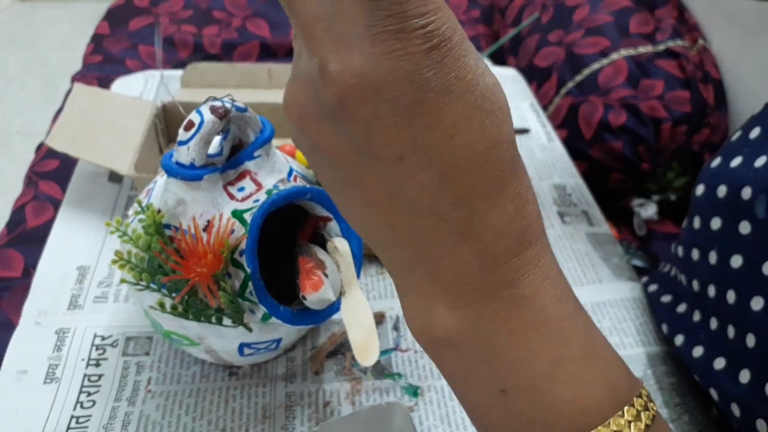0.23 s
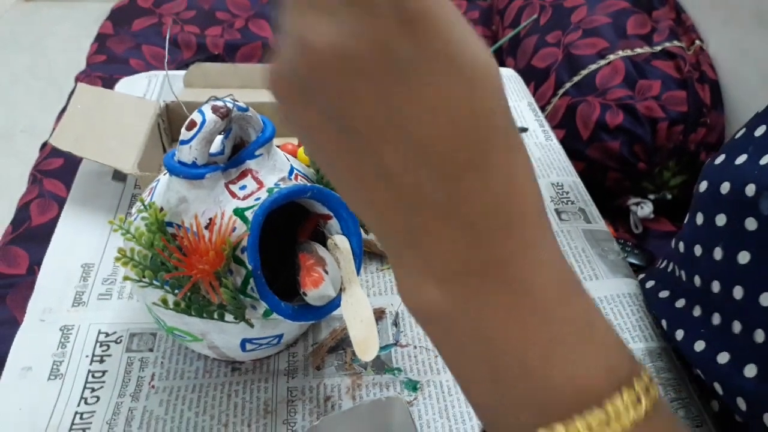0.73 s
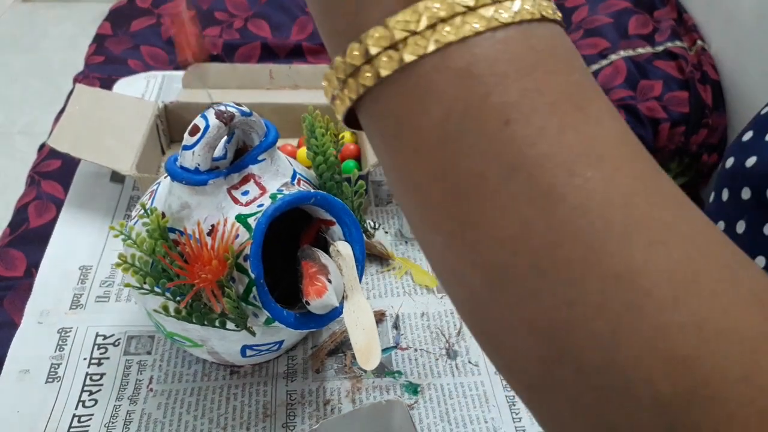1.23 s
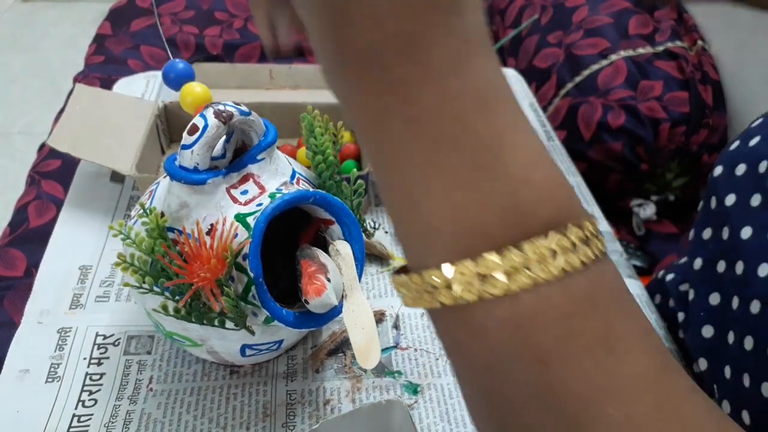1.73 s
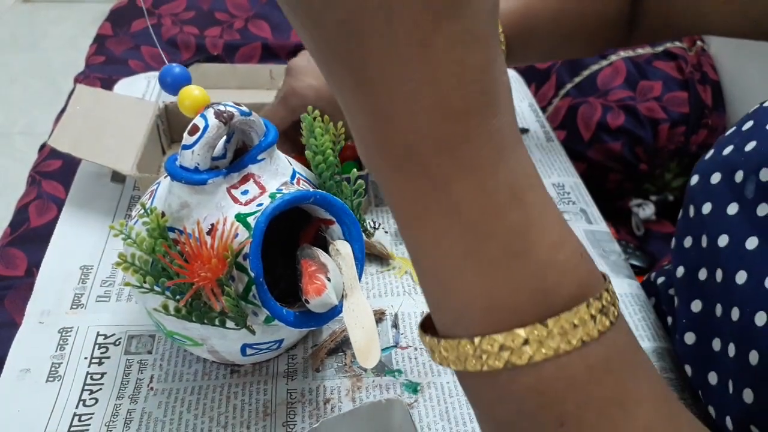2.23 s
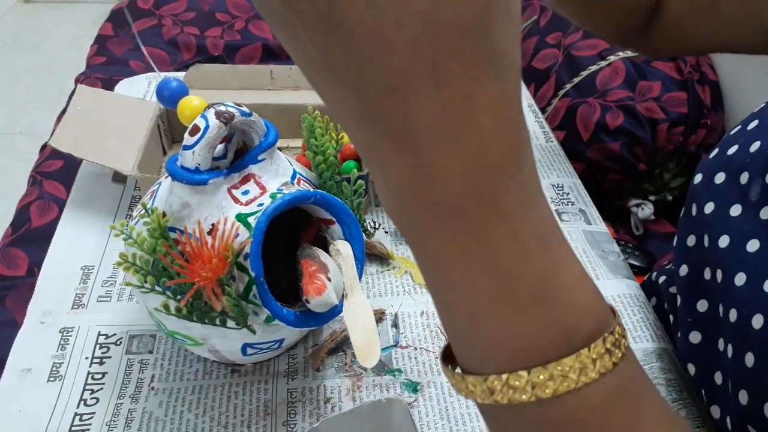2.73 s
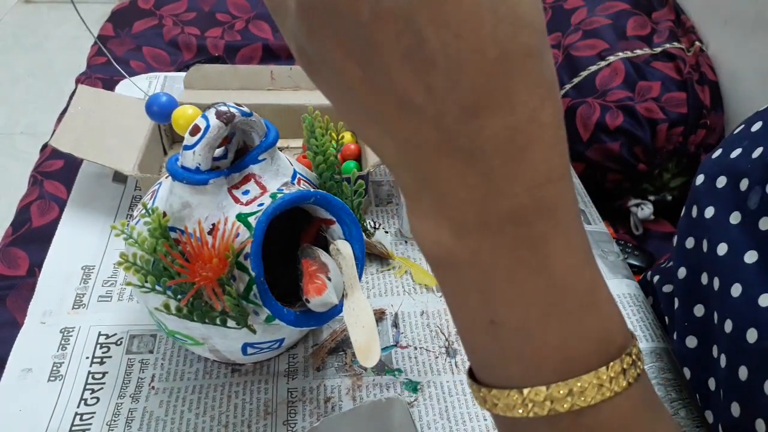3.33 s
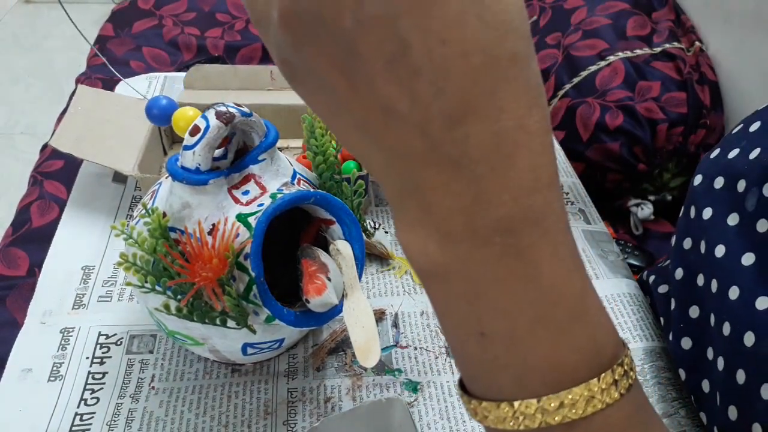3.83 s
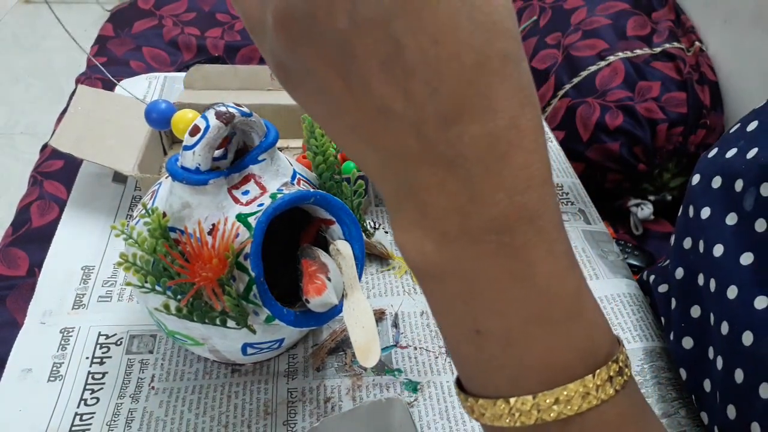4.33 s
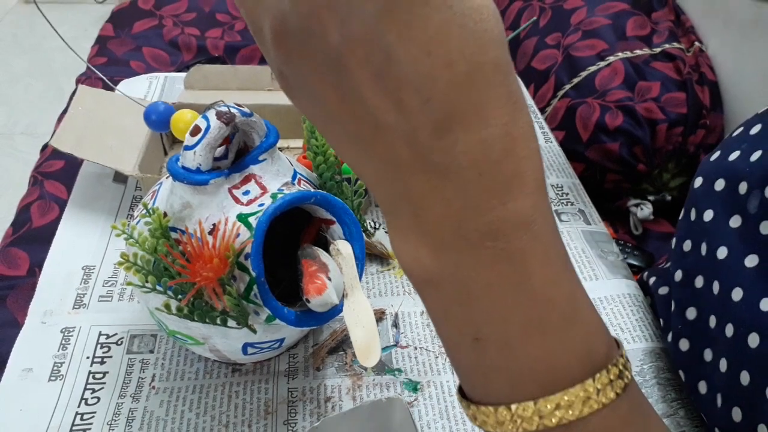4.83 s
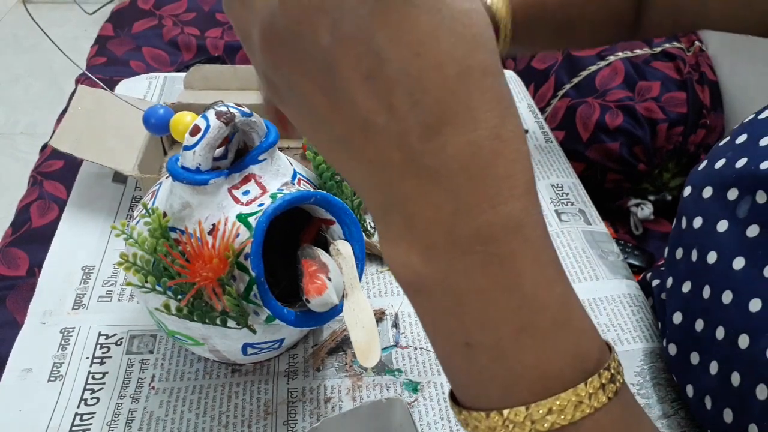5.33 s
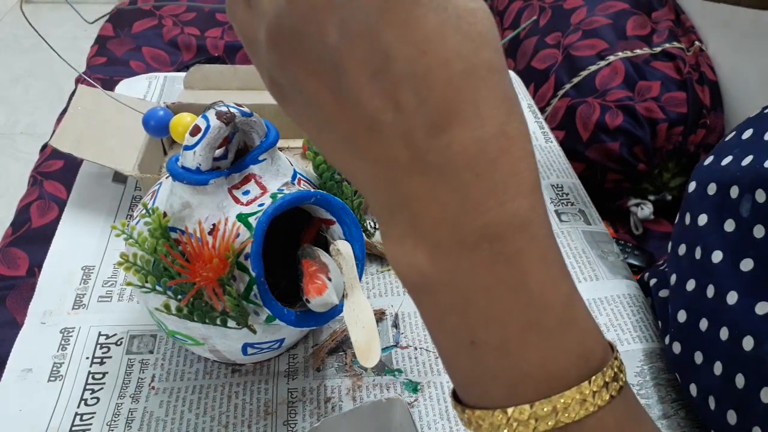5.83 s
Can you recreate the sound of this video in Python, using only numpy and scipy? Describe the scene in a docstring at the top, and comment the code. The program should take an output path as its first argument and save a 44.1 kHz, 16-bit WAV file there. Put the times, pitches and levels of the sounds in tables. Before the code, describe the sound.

Bangles on a beadworker's arm give soft clinks, a cloth brush, and a bright burst of ringing taps. Next come woody knocks and short scrapes of beads pushed in a box. The wire barely scratches and squeaks. A motor dies away behind, leaving faint hiss, low rumble and a clock tick each second. Late on, one double clink and one knock. Close microphone, small room, almost identical channels.

```python
"""Two metal bangles slide along a forearm and clink, as someone threads beads onto a wire in a small room. Each
clink is a noise crack plus two sets of damped modes; grazes are streams of small taps. Nearer the box, knocks,
rubs and rolling beads are shaped noise; the wire scratches and squeaks faintly. Behind them a motor's hum and
hiss fade, a far clock ticks once a second, and a low rumble drifts. Both channels hear almost the same, but for
a faint blurred copy of the sound and faint steady noise, opposite in the two."""
import sys
import numpy as np
from scipy import signal
from scipy.fft import rfft, irfft, next_fast_len
from scipy.io import wavfile
from scipy.ndimage import uniform_filter1d

SR = 44100
rng = np.random.default_rng(int(sys.argv[2]) if len(sys.argv) > 2 else 0)


def materialize(psi):
    """Save the field psi as 16-bit PCM at rate SR to the path in sys.argv[1].

    A 1-D psi becomes a single channel; in a 2-D psi each row is a channel.
    """
    bounded = np.clip(np.atleast_2d(psi).T, -1, 1)
    quanta = np.round(bounded * 32767).astype(np.int16)
    wavfile.write(sys.argv[1], SR, quanta)


N = 268216  # samples
TIME = np.arange(N) / SR  # s

# Room tone's hiss. Each row: frequency in Hz, relative level in dB per Hz.
HISS_COLOUR = [(88, -31), (150, -2), (332, -8), (462, -9.5), (500, -6), (656, -13.5), (1060, -17),
               (1450, -20.5), (1630, -19), (2230, -21.5), (4930, -22.5), (6600, -24), (7270, -24.5),
               (8010, -25), (15500, -24)]
HISS_DB = -74.5  # rms
# The room's low rumble. Each row: frequency in Hz, relative level in dB per Hz.
RUMBLE_COLOUR = [(15, -61), (25, -27.5), (36, -17), (54, 2.5), (102, -1.5), (129, -7), (173, -19),
                 (200, -20.5), (260, -47), (440, -120)]
RUMBLE_DB = -70  # rms between swells
# The rumble swells now and then. Each row: start in seconds, length in seconds, level in dB.
RUMBLE_SWELLS = [(0, 0.89, -65.5), (2.6, 0.63, -67)]
RUMBLE_RISE_DB_PER_S, RUMBLE_FALL_DB_PER_S = 120, 71
# A far fan's faint tones. Each row: frequency in Hz, level in dB rms.
FAN_TONES = [(496, -82.5), (402, -87.5)]
# Faint steady noise, opposite in the two channels. Each row: frequency in Hz, relative level in dB per Hz.
SIDE_NOISE_COLOUR = [(18, -32), (30, -5), (117, -2), (307, -7), (389, -3), (467, -9), (2990, -9),
                     (15500, -13)]
# How long the room rings. Each row: frequency in Hz, time to fall 60 dB in seconds.
ROOM_DECAY = [(150, 0.75), (500, 0.16), (1500, 0.39), (3500, 0.45), (7000, 0.3), (14000, 0.33)]
EDGE_HZ = 15900  # upper band limit

# Ticks of the far clock. Each row: start in seconds, level in dB.
CLOCK_TICKS = [(0.63, -63.5), (1.63, -68.5), (2.62, -68), (3.618, -70), (4.619, -66.5), (5.62, -68.5)]
# Colour of a tick. Each row: frequency in Hz, relative level in dB per Hz.
TICK_COLOUR = [(600, -13.5), (1300, -5), (2000, -3), (2700, -9), (3700, -6.5), (4500, -9), (5500, -10),
               (7500, -19), (9500, -10), (12000, -31)]

# The motor's hum. Each row: multiple of the shaft speed, level in dB rms before the surges act on it.
HUM_ORDERS = [(4, -62.5), (5, -53.5), (6, -61.5), (9, -69)]
SHAFT_HZ = 24.63  # mean turns per second
# The hum comes in surges. Each row: start in seconds, length in seconds, gain in dB.
HUM_SURGES = [(0, 0.31, 1.5), (0.67, 0.023, 0), (1.02, 0.031, -4)]
SURGE_RISE_DB_PER_S, SURGE_FALL_DB_PER_S = 100, 60
HUM_REST_DB, HUM_FADE_DB_PER_S = -12.5, 4  # gain of the fading hum that lingers under the surges
# The air that the motor moves. Each row: frequency in Hz, relative level in dB per Hz.
AIR_COLOUR = [(60, -8), (200, -1.5), (500, -6), (780, -13.5), (1000, -10.5), (1250, -20.5), (1900, -14.5),
              (2330, -7.5), (2700, -20.5), (3550, -14.5), (4500, -27.5), (4980, -10.5), (5700, -19.5),
              (8000, -30), (9200, -29.5), (11000, -46.5)]
# the rush sags slowly from AIR_DB, then fades faster after AIR_BEND_S
AIR_DB, AIR_SAG_DB_PER_S, AIR_BEND_S, AIR_FALL_DB_PER_S = -54.5, 7.5, 1.63, 30

# The arm brushes over cloth. Each row: start in seconds, length in seconds, level in dB.
BRUSHES = [(0.716, 0.0036, -53), (0.8, 0.18, -55.5), (1.05, 0.47, -68)]
BRUSH_RISE_DB_PER_S, BRUSH_FALL_DB_PER_S = 918, 143
# Colour of the cloth. Each row: frequency in Hz, relative level in dB per Hz.
CLOTH_COLOUR = [(60, -16), (220, 0), (450, -9), (700, -12), (1300, -1), (3000, 5.5), (6000, 5.5),
                (10000, 3.5), (13000, 0), (16000, -9.5)]

# The wire slides through a bead. Each row: start in seconds, length in seconds, level in dB.
THREADINGS = [(2.87, 0.23, -80.5), (3.125, .025, -75.5), (3.915, 0.013, -79)]
THREAD_RISE_DB_PER_S, THREAD_FALL_DB_PER_S = 253, 219
# Colour of the wire's scratch. Each row: frequency in Hz, relative level in dB per Hz.
WIRE_COLOUR = [(1500, -6.5), (4000, -4.5), (6000, -3), (7400, -5), (8300, -2), (9500, -2.5), (11500, -10.5),
               (16000, -10)]
# The wire squeaks in the hole of a bead. Each row: start in seconds, length in seconds,
# mean pitch at the start in Hz, mean pitch at the end in Hz, level in dB rms.
SQUEAKS = [(2.822, 0.19, 7300, 7390, -84.5), (2.951, 0.054, 15400, 14530, -79),
           (5.018, 0.072, 7440, 7480, -90), (5.058, 0.11, 11560, 11070, -79),
           (5.276, 0.11, 7450, 7370, -84)]

# Fingers rub the wall of the box. Each row: start in seconds, length in seconds, level in dB.
RUBS = [(1.78, .14, -81.5), (1.932, 0.071, -60.5), (2.14, 0.054, -65.5), (2.385, .06, -79),
        (5.168, 0.077, -67.5)]
RUB_RISE_DB_PER_S, RUB_FALL_DB_PER_S = 492, 264
# Colour of the rubbing. Each row: frequency in Hz, relative level in dB per Hz.
RUB_COLOUR = [(800, -6), (2000, -1), (3800, 12.5), (6000, 2), (8000, 1.5), (9500, 7), (12000, -2.5),
              (16000, -10)]
# A push sends beads rolling over the bottom of the box until they settle.
# Each row: start in seconds, level in dB, pitch of the box there in Hz.
PUSHES = [(1.927, -57, 900), (1.996, -56.5, 845), (2.15, -58, 1040), (2.272, -60, 907), (5.164, -62, 1270),
          (5.279, -97, 1078)]
PUSH_RISE_DB_PER_S, PUSH_HOLD_S, PUSH_FALL_DB_PER_S = 898, 0.029, 151
# Colour of the rolling where the box has the pitch SCRAPE_HZ.
# Each row: frequency in Hz, relative level in dB per Hz.
SCRAPE_COLOUR = [(30, -46), (100, 5), (300, -7.5), (600, 5.5), (1200, 1), (1800, -1), (2600, -27),
                 (4000, -34), (7000, -28)]
SCRAPE_HZ = 1000

# Dull knocks of beads in the box and of the hand and bangles on the work.
# Each row: start in seconds, level in dB, pitch of the knock in Hz.
KNOCKS = [(0.677, -50.5, 356), (0.7163, -55, 1000), (1.338, -54.5, 299), (1.458, -57.5, 1100),
          (1.462, -56, 472), (1.935, -55, 1900), (1.994, -43.5, 920), (2.0268, -45, 1020),
          (2.133, -56, 1490), (2.150, -45.5, 1270), (2.269, -57.5, 1000), (2.39, -55, 700),
          (2.422, -53, 588), (2.441, -58.5, 410), (3.421, -61, 460), (4.47, -55.5, 445),
          (4.501, -58.5, 557), (5.148, -59, 1520), (5.152, -51, 1380), (5.165, -56.5, 1820),
          (5.17, -41.5, 1230), (5.277, -54.5, 1266)]
# Colour of a knock. Each row: multiple of its pitch, relative level in dB per Hz.
KNOCK_COLOUR = [(.03, -41.5), (.1, -23), (.3, -10), (.6, 1), (1, 6), (1.3, -3), (1.9, -16), (3, -15),
                (5, -29.5), (12, -44.5)]
# a knock's 60 dB decay: a fixed part, plus a part given at the reference pitch
# that shortens by the power KNOCK_DAMPING of the pitch
KNOCK_DEAD_T60_S, KNOCK_T60_S, KNOCK_REFERENCE_HZ, KNOCK_DAMPING = 0.019, 0.13, 400, 2.9

# Modes of the two bangles, before tilt and detuning. Each row: frequency in Hz, relative level in dB.
FIRST_BANGLE_MODES = [(1954, -19.0), (2707, -12.5), (2534, -3), (2631, -1.0), (3440, -7.5), (3557, -18.0),
                      (3727, -3.5), (4307, -19), (4443, -13.0), (4735, -3.5), (4919, -8.5), (5329, -11.0),
                      (5857, -14.0), (6068, -17), (6358, -16.5), (6621, -16), (6763, -17.5), (6989, -16.0),
                      (7164, -20.0), (7269, -11.0), (7640, -8.5), (7843, -20.5), (8094, -21.5),
                      (8703, -18.0), (8973, -14.5), (9332, -20.0), (10749, -26), (11402, -25.5)]
SECOND_BANGLE_MODES = [(2634, 0.5), (3741, -2), (4525, -12), (4709, -2.5), (4932, -3), (5058, -1.5),
                       (5251, -7.5), (5324, -7), (5743, -8.5), (6063, -5.5), (6617, -2.5), (6988, -5),
                       (7079, -1), (7670, -9), (8086, -11.5), (8597, -2.5), (9363, -8.5), (9516, -10),
                       (9644, -6.5), (9728, -6), (9847, -11.5), (11095, -13.5), (11282, -7), (11776, -13),
                       (12010, -12), (12858, -10.5)]
# Short crack of metal on metal, before tilt. Each row: frequency in Hz, relative level in dB per Hz.
CRACK_COLOUR = [(120, -23), (400, -16.5), (900, -25), (1500, -11), (2300, -6), (4800, 10), (7000, -2.5),
                (9500, 1), (13000, -8.5), (16000, -15.5)]
# The bangles graze as the arm moves. Each row: start in seconds, length in seconds, level in dB.
GRAZES = [(0.8, 0.043, -54), (0.868, .08, -47.5), (1.08, .065, -44.5), (1.2, .025, -50), (1.272, .1, -46),
          (1.47, 0.013, -61)]
GRAZE_RISE_DB_PER_S, GRAZE_FALL_DB_PER_S = 450, 230.5
# Colouring of a light graze. Each row: frequency in Hz, relative gain in dB.
GRAZE_COLOUR = [(1500, -16.5), (2600, -5), (3700, -0.5), (4600, -5), (5300, 3.5), (7300, -4.5), (9300, -1),
                (10500, -6), (16000, -7)]
# Bangle clinks. Each row: start in seconds, level in dB, glance from 0 square-on to 1 skimming,
# share of the second bangle's power from 0 to 1.
CLINKS = [(0.130, -53.5, 1, .4), (0.148, -51.5, 0.24, 0.9), (0.162, -45.5, 0.59, 0.5),
          (0.805, -55, 0.5, 0.4), (0.885, -44.5, 0.81, 0.3), (0.928, -46, 1, 0.15), (1.067, -45, 0.48, 0.5),
          (1.078, -44.5, 0.14, 0), (1.106, -41, 0.43, 0.34), (1.121, -38, 0.7, 0.3),
          (1.205, -42, 0.54, 0.13), (1.296, -32.5, 0, .03), (1.301, -30.5, 0, 0), (1.336, -24.5, 0.0044, 0),
          (1.342, -29, 0.045, .05), (1.399, -42, 0.54, .2), (1.457, -36.5, 0.2, 0.17),
          (4.466, -35.5, .44, .99), (4.469, -33, 0.73, 0.7)]
# what the glance does to a clink: (square-on, skimming)
CLINK_TILT_DB = (-5.5, 10.5)  # per octave
CLINK_CRACK_DB = (-5.5, -1)  # relative to the ringing
CLINK_RISE_S = (0.00036, 0.0019)  # time constant
CLINK_ROOM_DB = (-6.5, -1)  # feed to the room


def gain_of(db):
    """Decibels to amplitude."""
    return 10 ** (np.asarray(db) / 20)


def evened(x):
    """Scales to rms 1."""
    return x / np.sqrt(np.mean(x ** 2) + 1e-20)


def struck(x):
    """Scales a blow so that its first 10 ms have rms 1."""
    return x / np.sqrt(np.mean(x[:SR // 100] ** 2) + 1e-20)


def read(points, hz):
    """A table joined by straight lines on a log-frequency axis."""
    f, value = np.transpose(points)
    return np.interp(np.log(hz + 1e-3), np.log(f), value)


def coloured(x, spectrum, scale=1, tilt_db=0):
    """Filters x by a spectrum stretched by scale and tilted per octave from 1 to 7 kHz; rms 1."""
    size = next_fast_len(len(x))
    hz = np.fft.rfftfreq(size, 1 / SR)
    octaves = np.log2(np.clip(hz, 1000, 7000) / 1000)
    gain = gain_of(read(spectrum, hz / scale) + tilt_db * octaves)
    return evened(irfft(rfft(x, size) * gain, size)[:len(x)])


def noise(spectrum, size=N, scale=1, tilt_db=0):
    """Coloured noise of rms 1."""
    return coloured(rng.standard_normal(size), spectrum, scale, tilt_db)


def grains(per_s, spread_db):
    """Tiny impacts at random moments, a few much larger than the rest."""
    size = gain_of(spread_db * np.minimum(rng.exponential(1, N), 3))
    return size * rng.choice([-1, 1], N) * (rng.random(N) < per_s / SR)


def add(mix, s, sound):
    """Mixes a sound in at s seconds."""
    part = mix[max(round(s * SR), 0):][:len(sound)]
    part += sound[:len(part)]


def strokes(rows, rise_db_per_s, fall_db_per_s):
    """Gain per sample of strokes (start, length, dB): each rises, holds and falls away."""
    power = 0
    for start, length, db in rows:
        early = np.maximum(start - TIME, 0)
        late = np.maximum(TIME - start - length, 0)
        stroke_db = np.maximum(db - rise_db_per_s * early - fall_db_per_s * late, -200)
        power = power + gain_of(stroke_db) ** 2
    return np.sqrt(power)


def tones(lines, waver_hz):
    """Steady machine tones whose pitch wanders a little."""
    knots, out = np.arange(0, N / SR + 1, 1 / 10), 0
    for hz, db in lines:
        drift = waver_hz * np.interp(TIME, knots, rng.standard_normal(len(knots)))
        turns = np.cumsum(hz + drift) / SR + rng.random()
        out = out + gain_of(db) * np.sqrt(2) * np.sin(2 * np.pi * turns)
    return out


def room_tone():
    """A faint hiss and fan whine above a drifting rumble."""
    swells = strokes(RUMBLE_SWELLS, RUMBLE_RISE_DB_PER_S, RUMBLE_FALL_DB_PER_S)
    rumble = np.hypot(gain_of(RUMBLE_DB), swells) * noise(RUMBLE_COLOUR)
    hiss = gain_of(HISS_DB) * noise(HISS_COLOUR)
    return hiss + rumble + tones(FAN_TONES, waver_hz=4.3)


def room(x, gap=0.0069, early_db=5, early_s=0.026):
    """Near surfaces answer first, then a diffuse tail in which each band dies at its own speed."""
    size = SR * 3 // 4
    t = np.arange(size) / SR
    echoes = rng.choice([-1., 1.], size) * (rng.random(size) < 4000 / SR) * (t > gap)
    echoes = echoes * gain_of(early_db * np.exp(-t / early_s))
    hz, when, bands = signal.stft(echoes, SR, nperseg=256)
    decay = gain_of(-60 * when / read(ROOM_DECAY, hz)[:, None])
    tail = signal.istft(bands * decay, SR, nperseg=256)[1]
    return signal.oaconvolve(x, tail / np.linalg.norm(tail))[:N]


def moving_room(x, turns_per_s=4, count=3):
    """As the arm moves, each clink meets a different pattern of echoes."""
    phase = turns_per_s * TIME + np.arange(count)[:, None] / count
    weights = np.cos(np.pi * phase) * np.sqrt(2 / count)
    return sum(room(w * x) for w in weights)


def clock(rise=0.032):
    """A far clock: each tick arrives as noise smeared into a soft puff."""
    out, t = np.zeros(N), np.arange(2 ** 14) / SR
    puff = t / rise * np.exp(1 - t / rise)
    for s, db in CLOCK_TICKS:
        add(out, s, gain_of(db) * noise(TICK_COLOUR, size=len(t)) * puff)
    return out


def motor():
    """Orders of the shaft, locked in step, throb once a turn over the motor's rush of air; both fade."""
    wander = 0.059 * np.sin(2 * np.pi * (0.9 * TIME + rng.random()))  # turns
    turns = SHAFT_HZ * TIME + wander
    hum = sum(gain_of(db) * np.sqrt(2) * np.cos(2 * np.pi * round(order) * turns) for order, db in HUM_ORDERS)
    surging = strokes(HUM_SURGES, SURGE_RISE_DB_PER_S, SURGE_FALL_DB_PER_S)
    lingering = gain_of(HUM_REST_DB - HUM_FADE_DB_PER_S * TIME)
    air_db = AIR_DB - AIR_SAG_DB_PER_S * TIME - AIR_FALL_DB_PER_S * np.maximum(TIME - AIR_BEND_S, 0)
    return np.hypot(surging, lingering) * hum + gain_of(air_db) * noise(AIR_COLOUR)


def brush():
    """Skin over cloth: fine, dense friction grains."""
    pressure = strokes(BRUSHES, BRUSH_RISE_DB_PER_S, BRUSH_FALL_DB_PER_S)
    return pressure * coloured(grains(6000, 2), CLOTH_COLOUR)


def wire(waver=0.017):
    """Thin wire drags through a bead: a fine scratch of friction grains, and brief wavering squeaks."""
    drag = strokes(THREADINGS, THREAD_RISE_DB_PER_S, THREAD_FALL_DB_PER_S)
    out = drag * coloured(grains(2500, 4.3), WIRE_COLOUR)
    for s, length, start_hz, end_hz, db in SQUEAKS:
        size = round(length * SR)
        wobble = evened(uniform_filter1d(rng.standard_normal(size), size=64))
        hz = np.linspace(start_hz, end_hz, size) * (1 + waver * wobble)
        squeak = np.hanning(size) * np.sin(2 * np.pi * np.cumsum(hz) / SR)
        add(out, s, gain_of(db) * evened(squeak))
    return out


def rummage():
    """Pushed beads drag over the bottom of the box while the fingers rub its wall."""
    pressure = strokes(RUBS, RUB_RISE_DB_PER_S, RUB_FALL_DB_PER_S)
    out = pressure * coloured(grains(3000, 3.78), RUB_COLOUR)
    rolling = grains(700, 2.6)
    for s, db, hz in PUSHES:
        speed = strokes([(s, PUSH_HOLD_S, db)], PUSH_RISE_DB_PER_S, PUSH_FALL_DB_PER_S)
        out = out + speed * coloured(rolling, SCRAPE_COLOUR, scale=hz / SCRAPE_HZ)
    return out


def knocks(tone_db=-8):
    """A broad, quickly dead thud; only the low knocks also ring the hollow work briefly."""
    out, t = np.zeros(N), np.arange(2 ** 13) / SR
    for s, db, hz in KNOCKS:
        t60 = KNOCK_DEAD_T60_S + KNOCK_T60_S * (KNOCK_REFERENCE_HZ / hz) ** KNOCK_DAMPING
        hollowness = np.interp(hz, [380, 700], [1, 0])
        hollow = gain_of(tone_db) * hollowness * np.sin(2 * np.pi * hz * t)
        body = noise(KNOCK_COLOUR, size=len(t), scale=hz) + hollow
        envelope = gain_of(-60 * t / t60) * (1 - np.exp(-t / 0.00058))
        add(out, s, gain_of(db) * struck(body * envelope))
    return out


def ring(modes, t, tilt_db, t60=.1, damping=0.14, spread_db=0.0):
    """A bangle rings briefly, damped and slightly detuned by the skin it rests on."""
    hz, db = np.transpose(modes)[:, :, None]
    octaves = np.log2(np.minimum(hz, 7000) / hz.min())
    # each blow lands elsewhere, which changes the mix of the high modes most
    db = db + tilt_db * octaves + spread_db * octaves * rng.standard_normal(hz.shape)
    hz = hz * (1 + .002 * rng.standard_normal(hz.shape))
    # t60 belongs to the lowest mode; higher ones die sooner
    decay = np.exp(-t * (np.log(1000) / t60 * 2 ** (damping * octaves)))
    waves = np.sin(2 * np.pi * (hz * t + rng.random(hz.shape)))
    return struck((gain_of(db) * decay * waves).sum(0))


def slide(rasp_db=-5, first_tilt_db=7, second_tilt_db=0, count=20):
    """The bangles' engraved faces graze: a stream of small taps, each spot with its own mix of modes."""
    t, jingle = np.arange(2 ** 12) / SR, 0
    for k in range(count):
        # every fourth spot is on the second bangle
        modes, tilt_db = (FIRST_BANGLE_MODES, first_tilt_db) if k % 4 else (SECOND_BANGLE_MODES, second_tilt_db)
        tap = ring(modes, t, tilt_db, t60=.08, spread_db=4)
        jingle = jingle + signal.oaconvolve(grains(11, 2.1), tap)[:N]
    rasp = gain_of(rasp_db) * coloured(grains(1500, 4), CRACK_COLOUR)
    pressure = strokes(GRAZES, GRAZE_RISE_DB_PER_S, GRAZE_FALL_DB_PER_S)
    return pressure * coloured(evened(jingle) + rasp, GRAZE_COLOUR)


def clinks(crack_t60=0.033, first_t60=.072, second_t60=0.09):
    """Bangle meets bangle: a crack, then both ring; skimming is brighter and softer in onset."""
    direct, room_feed, t = np.zeros(N), np.zeros(N), np.arange(2 ** 13) / SR
    by_glance = (CLINK_TILT_DB, CLINK_CRACK_DB, CLINK_RISE_S, CLINK_ROOM_DB)
    for s, db, glance, share in CLINKS:
        share = np.clip(share, 0, 1)
        tilt_db, crack_db, rise, room_db = (np.interp(glance, [0, 1], ends) for ends in by_glance)
        # light blows pick out a few modes
        spread_db = np.interp(db, [-42, -34], [3, 1])
        first = ring(FIRST_BANGLE_MODES, t, tilt_db, t60=first_t60, spread_db=spread_db)
        second = ring(SECOND_BANGLE_MODES, t, tilt_db, t60=second_t60, spread_db=spread_db)
        hit = noise(CRACK_COLOUR, size=len(t), tilt_db=0.57 * tilt_db - 1)
        crack = struck(hit * gain_of(-60 * t / crack_t60))
        ringing = np.sqrt(1 - share) * first + np.sqrt(share) * second
        blow = ringing + gain_of(crack_db) * crack
        blow = gain_of(db) * struck(blow * (1 - np.exp(-t / rise)))
        add(direct, s, blow)
        add(room_feed, s, gain_of(room_db) * blow)
    return direct, room_feed


def scene(slide_wet_db=-4, box_wet_db=-3, side_db=-41, side_noise_db=-84):
    """Both channels share the sound; a faint blurred copy of it and faint steady noise are opposite in the two."""
    metal, metal_feed = clinks()
    graze = slide()
    box = knocks() + rummage()
    echoes = moving_room(metal_feed + gain_of(slide_wet_db) * graze + gain_of(box_wet_db) * box)
    mid = metal + graze + box + echoes + wire() + brush() + motor() + clock() + room_tone()
    side = gain_of(side_db) * room(mid) + gain_of(side_noise_db) * noise(SIDE_NOISE_COLOUR)
    return np.array([mid + side, mid - side])


def record(dry, low_cut_hz=42):
    """The microphone's bass roll-off and the recorder's band limit."""
    bass_cut = signal.butter(4, low_cut_hz, "high", fs=SR, output="sos")
    thin = signal.sosfilt(bass_cut, dry)
    band_limit = signal.firwin(511, EDGE_HZ, window=("kaiser", 9), fs=SR)
    return signal.oaconvolve(thin, band_limit[None], "same")


dry = scene()
out = record(dry)
materialize(out)
```